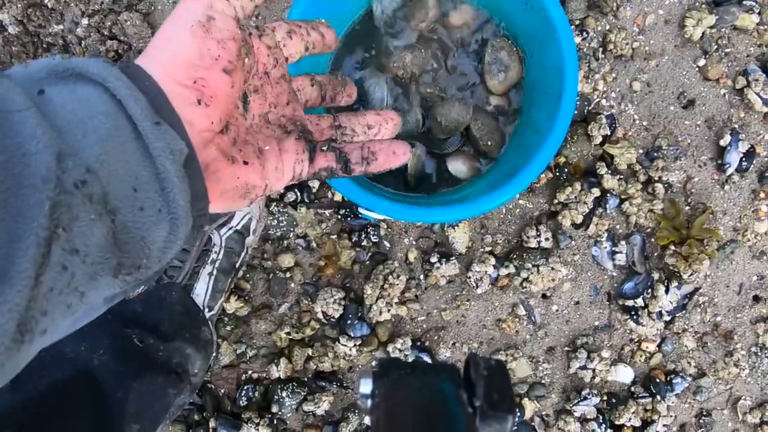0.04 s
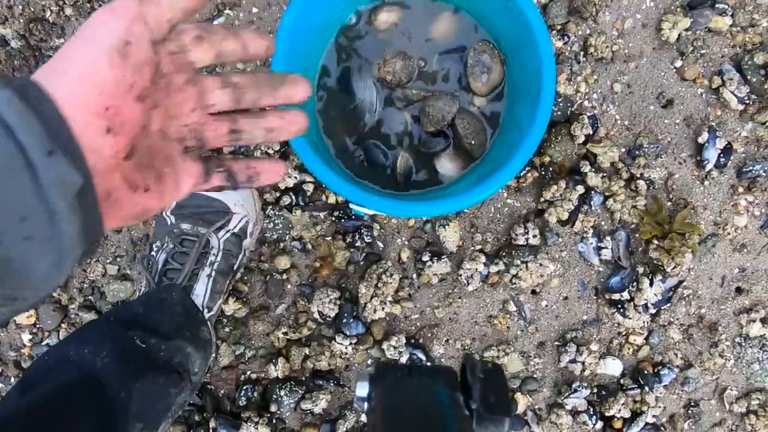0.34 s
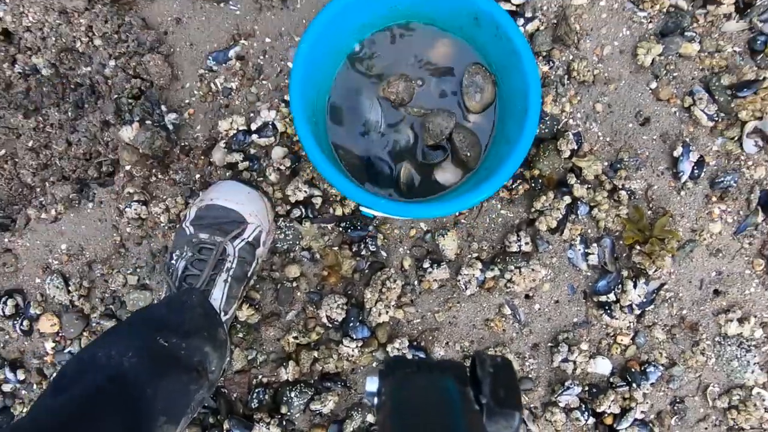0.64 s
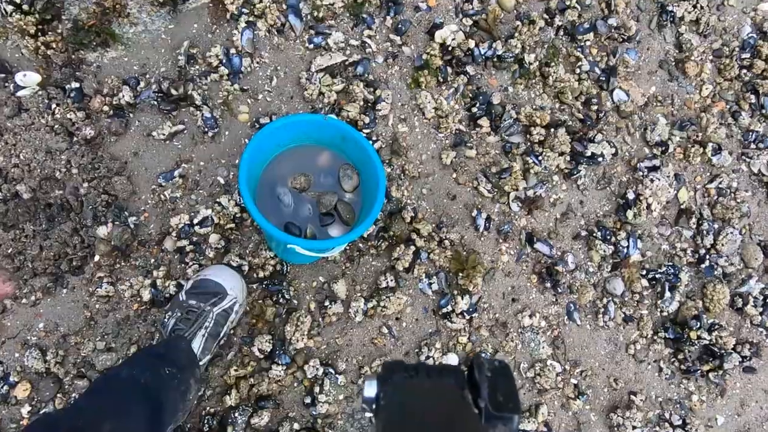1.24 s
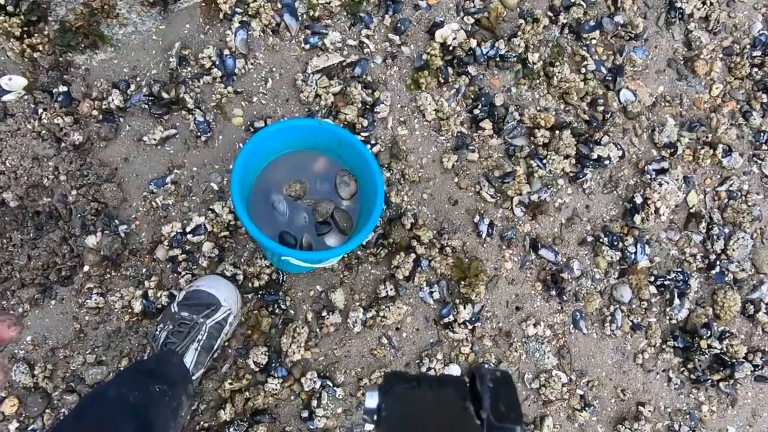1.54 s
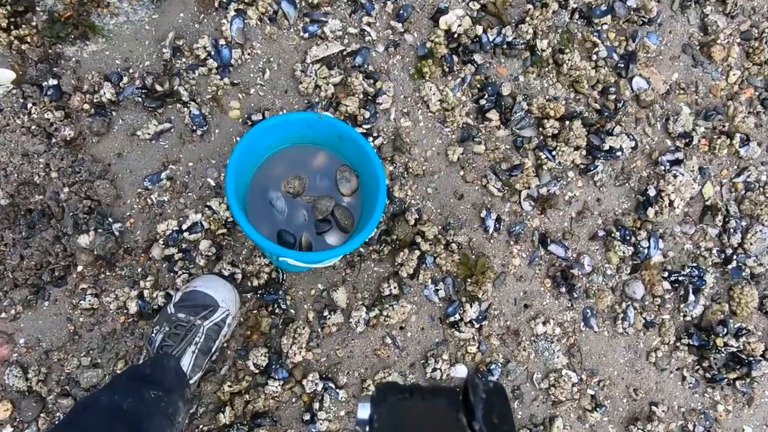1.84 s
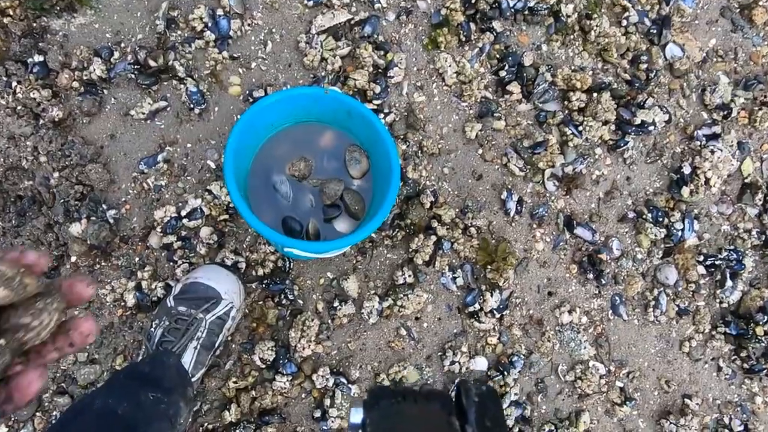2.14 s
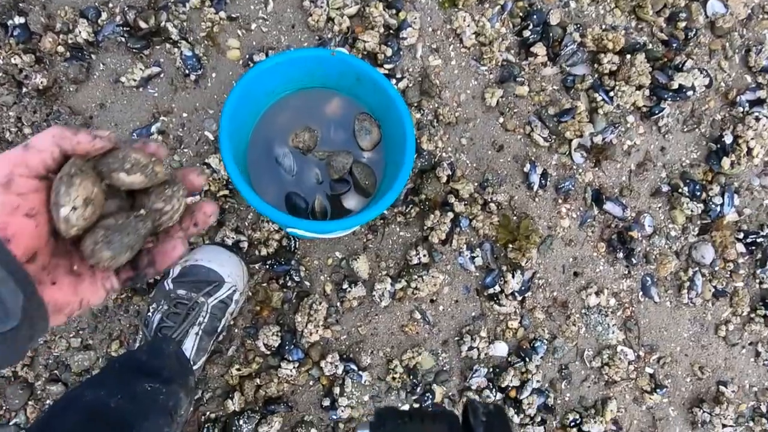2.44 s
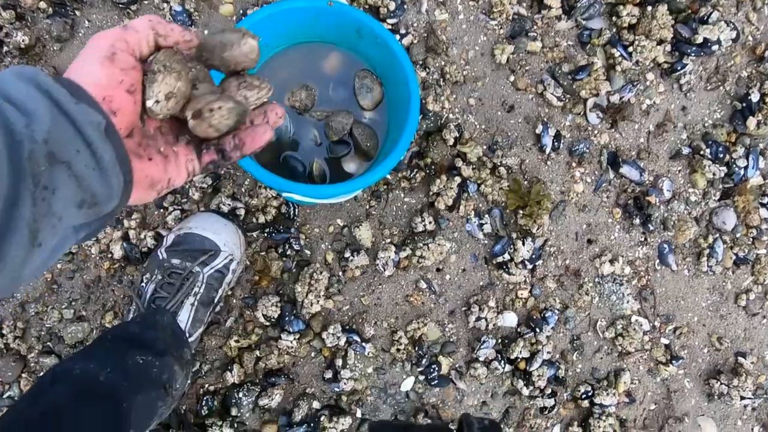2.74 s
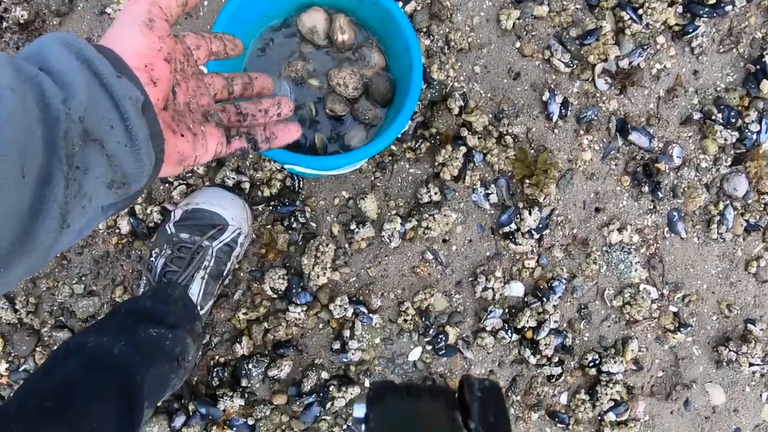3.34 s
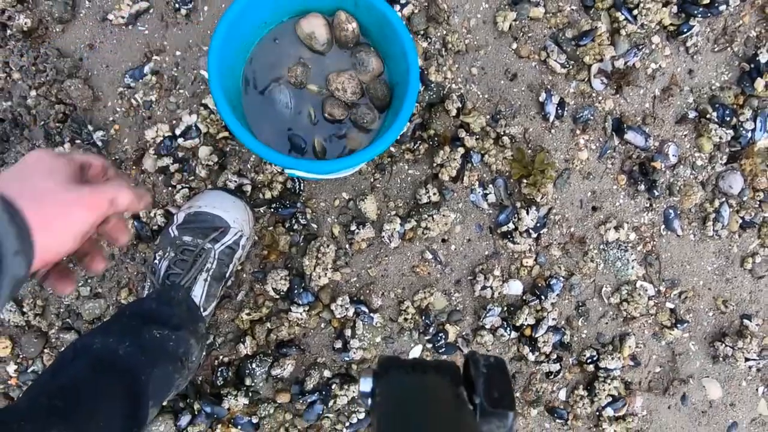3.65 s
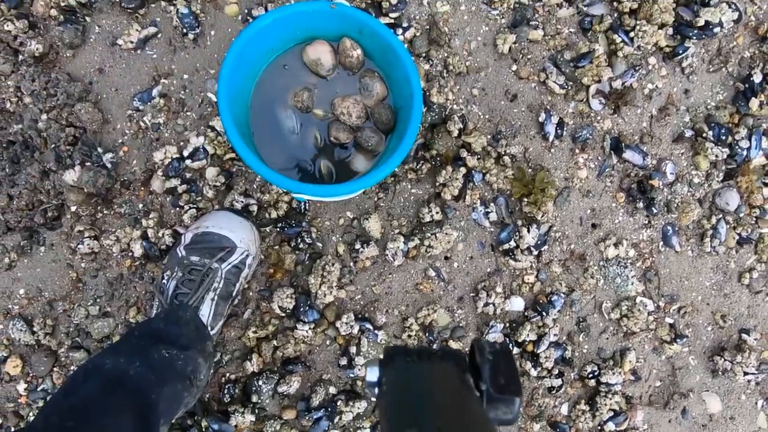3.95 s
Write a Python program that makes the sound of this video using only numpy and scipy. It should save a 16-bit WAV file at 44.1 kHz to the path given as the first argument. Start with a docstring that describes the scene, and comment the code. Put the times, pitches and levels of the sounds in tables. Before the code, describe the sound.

Close up on a pebbly beach, two handfuls of clams tumble into a bucket of water, knocking and splashing about three seconds apart. Between them come pebble clicks, a sleeve swish and a microphone scrape, over faint wind and ticking grit.

```python
"""A shingle beach, the microphone close to a plastic bucket of shallow water. Two handfuls of clams drop in,
three seconds apart: shells ring on shells, knock the bucket and stir up bubbles and spray. In between, pebbles
click and scrunch, a sleeve swishes, and after one second a scrape sounds right at the microphone; soon after,
the sound cuts out briefly. Wet grit ticks and low wind rumbles throughout."""
import sys
import numpy as np
from scipy import signal
from scipy.fft import rfft, irfft, next_fast_len
from scipy.io import wavfile
from scipy.ndimage import map_coordinates

SR = 44100
rng = np.random.default_rng(int(sys.argv[2]) if len(sys.argv) > 2 else 0)


def wrap_up_sound(samples):
    """Save the sound to the file named by the first command line argument, as 16-bit audio."""
    columns = np.atleast_2d(samples).T
    # keep every value between -1 and 1, then stretch to whole-number steps
    tamed = np.clip(columns, -1, 1)
    steps = np.round(tamed * 32767).astype(np.int16)
    wavfile.write(sys.argv[1], SR, steps)


N = 176400

# microphone colour on shells and drips, bright middle, sharp drop near 5 kHz: frequency_hz, gain_db
MIC_TONE = [(300, -47.5), (1500, 3.5), (2300, -0.5), (4450, 2.5), (5100, -9.5), (8000, -39.5),
            (16000, -46.5)]


def amp(db):
    """Decibels to gain."""
    return 10 ** (np.asarray(db) / 20)


def unit(x):
    """Scale to rms 1."""
    return x / np.sqrt(np.mean(x ** 2) + 1e-20)


def swell(rows, column=1):
    """Gain per sample from rows of time_s, level_db; silent outside them."""
    rows = np.array(rows)
    return amp(np.interp(np.arange(N) / SR, rows[:, 0], rows[:, column], left=-np.inf, right=-np.inf))


def wobble(per_s):
    """A smooth random curve through per_s knots a second."""
    return map_coordinates(rng.standard_normal(N // 20), [np.arange(N) * per_s / SR])


def colour(x, tone):
    """Minimum-phase filter through points of frequency_hz, gain_db on a log frequency axis."""
    size = 2 * next_fast_len(len(x))
    hz, db = np.transpose(tone)
    gain = amp(np.interp(np.log(np.fft.rfftfreq(size, 1 / SR) + 1), np.log(hz + 1), db))
    cepstrum = irfft(np.log(gain))
    cepstrum[1:size // 2] *= 2
    cepstrum[size // 2 + 1:] = 0
    return irfft(rfft(x, size) * np.exp(rfft(cepstrum)))[:len(x)]


def add(track, start_s, x):
    """Mix x into the track at start_s."""
    i = int(round(start_s * SR))
    lo, hi = max(i, 0), min(i + len(x), N)
    if hi > lo:
        track[lo:hi] += x[lo - i:hi - i]


def fade(t, t60):
    """Exponential decay, 60 dB down after t60 seconds."""
    return np.exp(-np.log(1000) * t / t60)


def specks(per_s, spread_db):
    """Sparse random impulses of uneven size, rms 1."""
    impulses = (rng.random(N) < per_s / SR) * rng.choice([-1, 1], N)
    return unit(impulses * amp(spread_db * np.clip(rng.standard_normal(N), -2, 2)))


def gritty(tone, per_s, share):
    """Coloured noise with a share of its power in grains, rms 1."""
    hiss = np.sqrt(1 - share) * rng.standard_normal(N)
    grains = np.sqrt(share) * specks(per_s, spread_db=9.1)
    return unit(colour(hiss + grains, tone))


def wet_grit():
    """Wet grit and clothing rustle and tick all around the microphone."""
    # level of the rustle: time_s, middle_db, treble_db
    levels = [(0, -54.5, -62), (.45, -60, -73), (.75, -56, -72), (.88, -49, -66), (1.08, -56.5, -75),
              (1.36, -65.5, -86), (1.76, -58, -80.5), (1.95, -57.5, -73), (2.13, -60, -73),
              (2.23, -55.5, -62.5), (2.42, -48, -68.5), (2.6, -54, -66.5), (2.74, -54, -69.5),
              (2.9, -47, -57), (3.02, -53.5, -70), (3.46, -55.5, -74.5), (3.86, -53.5, -67),
              (4.05, -54, -88)]
    # tones of the grit, its treble sparkle and the wet ticks: frequency_hz, gain_db
    grit_tone = [(100, -35.5), (500, -3.5), (1000, 3.5), (1380, 5), (1750, 3.5), (2900, 4), (3900, 5.5),
                 (4600, 0), (5300, -16.5), (7000, -40), (16000, -85.5)]
    sparkle_tone = [(3000, -31.5), (5200, -3), (6400, -5), (7800, 5), (10700, -2.5), (11800, -10),
                    (16000, -18)]
    tick_tone = [(400, -44), (1080, -3.5), (1410, 9), (1800, -3.5), (4300, -2.5), (5300, -17), (9000, -19),
                 (16000, -59)]
    grit = gritty(grit_tone, per_s=500, share=0.29) * amp(3.3 * wobble(24.72))
    sparkle = gritty(sparkle_tone, per_s=400, share=0.45) * amp(2.7 * wobble(64))
    tick_decay = fade(np.arange(SR // 20) / SR, t60=0.012)
    tick_power = signal.fftconvolve(specks(per_s=70, spread_db=3.5) ** 2, tick_decay ** 2)[:N]
    ticks = unit(colour(np.sqrt(np.abs(tick_power)) * rng.standard_normal(N), tick_tone))
    return (grit + amp(-3.5) * ticks) * swell(levels) + sparkle * swell(levels, column=2)


def wind():
    """Low wind rumbles, wavering slightly in level."""
    # tone of the rumble: frequency_hz, gain_db
    rumble_tone = [(12, 0), (28, 3), (55, 0), (115, -5), (160, 1.5), (225, -4.5), (300, -12.5), (420, -22),
                   (700, -24.5), (2000, -80.5)]
    return unit(colour(rng.standard_normal(N), rumble_tone)) * amp(-42 + 1.47 * wobble(5.6))


def contacts(hits, body_modes, scatter_t60_s, scatter_db, grind_db):
    """Each contact grinds, knocks a body, rings a shell, cracks at its edge and scatters nearby."""
    # modes of a shell: pitch_ratio, level_db, t60_s
    shell_modes = [(.68, -13.5, 0.023), (.87, 1.5, 0.0095), (1, -2.5, 0.026), (1.14, -1, 0.015),
                   (1.36, -9.5, 0.0053)]
    # modes of its thin lip: pitch_hz, level_db, t60_s
    lip_modes = [(7150, 5, 0.021), (8130, 3, .014), (9200, -1.5, 0.0098), (10830, -3.5, .012)]
    # tone of the edge crack: frequency_hz, gain_db
    crack_tone = [(1000, -31), (4000, 13.5), (5500, 7.5), (7200, 7.5), (8600, -10.5), (10400, 7.5),
                  (12000, -5.5), (16000, -35)]
    blow_s, grind_s, glancing_db = 0.0044, 0.0027, -27
    out, t, lead = np.zeros(N), np.arange(SR // 10) / SR, SR // 100

    def burst(t60):
        return rng.standard_normal(len(t)) * fade(t, t60)

    def ring(modes, scale, life):
        return sum((-1) ** k * amp(db + rng.normal(0, 1.1)) * fade(t, t60 * life)
                   * np.sin(2 * np.pi * pitch * scale * rng.normal(1, 0.023) * t)
                   for k, (pitch, db, t60) in enumerate(modes))

    for start_s, knock_db, shell_db, shell_hz, crack_db in hits:
        # a hard blow is cleaner than a glancing one; it wedges the shell and cuts its ring short
        rough = amp(-0.42 * max(max(shell_db, knock_db) - glancing_db, 0))
        life = rough ** 0.65
        grind = rng.standard_normal(lead) * np.exp(-t[:lead][::-1] / grind_s)
        grind *= rough * amp(grind_db) / np.linalg.norm(grind)
        scatter = burst(scatter_t60_s)
        scatter *= rough * amp(scatter_db) / np.linalg.norm(scatter)
        path = np.concatenate([grind, [1], scatter])
        shell_ring = unit(ring(shell_modes, shell_hz, life))
        rasp = amp(5.5) * unit(burst(0.0097 * life))
        shell = colour(shell_ring + rasp, MIC_TONE)
        crack = unit(colour(burst(0.005 * life), crack_tone))
        lip = amp(-4) * unit(ring(lip_modes, 1, life))
        knock = ring(body_modes, rng.normal(1, 0.06), life=1)  # pitch depends on where the blow lands
        for level_db, part in (knock_db, knock), (shell_db, shell), (crack_db, crack + lip):
            heard = signal.fftconvolve(part, path)[:len(t)]
            heard *= np.sqrt(blow_s * SR / np.sum(heard ** 2))  # the energy of blow_s at rms 1
            add(out, start_s - lead / SR, amp(level_db) * heard)
    return out


def clams():
    """Clams land on each other and knock the bucket; the sound scatters off its wall."""
    # landings: start_s, knock_db, shell_db, pitch_hz, crack_db
    landings = [(.0049, -15, -20.5, 2830, -39), (.0109, -28.5, -16, 2980, -35.5),
                (.0183, -30.5, -20.5, 3330, -52), (.024, -27.5, -30.5, 2890, -57),
                (.0526, -34, -29.5, 4090, -47), (.0594, -36.5, -31.5, 3250, -56),
                (.0687, -30, -38, 3220, -53), (.0916, -32, -28.5, 3350, -42.5),
                (.0973, -31.5, -54, 3440, -48), (.1045, -56, -38.5, 3500, -43),
                (.115, -30.5, -31, 3510, -52), (.1244, -31.5, -19.5, 2450, -48),
                (.1588, -28.5, -40, 2900, -55), (3.1069, -17.5, -21, 2990, -25),
                (3.1466, -31.5, -32, 2980, -50), (3.156, -35, -22, 3840, -36),
                (3.1598, -27, -58, 3180, -52), (3.1907, -26.5, -22.5, 3560, -36),
                (3.1956, -37.5, -26, 3380, -46), (3.2245, -34.5, -14, 4200, -35.5),
                (3.2353, -29.5, -25.5, 3950, -54), (3.2651, -26.5, -16, 3400, -39),
                (3.2991, -28, -23, 2970, -38), (3.3043, -24.5, -38, 2820, -54),
                (3.3222, -31.5, -24.5, 2390, -83), (3.3272, -30, -30, 3420, -48),
                (3.3555, -37.5, -60, 3200, -46), (3.3875, -41.5, -26.5, 2820, -43),
                (3.47, -37, -53, 2900, -82)]
    # modes of the bucket with its water: pitch_hz, level_db, t60_s
    bucket_modes = [(661, 1, 0.025), (855, -1.5, 0.019), (1317, 2, 0.025), (1660, -9, 0.016)]
    return contacts(landings, bucket_modes, scatter_t60_s=0.048, scatter_db=-2, grind_db=-4)


def splashes():
    """Bubbles rising in pitch and fine spray last while the clams tumble in, then settle."""
    # water stirred by each handful: start_s, hold_s, bubbles_db, spray_db
    handfuls = [(0.035, 0.075, -36, -39), (3.149, 0.22, -43, -45.5)]
    # tones of the bubbles and the spray: frequency_hz, gain_db
    bubble_tone = [(200, -9), (420, 6.5), (610, 10), (820, 7.5), (1050, -21.5), (1330, -19), (1800, -15.5),
                   (4000, -16.5), (8000, -17.5)]
    spray_tone = [(200, -4.5), (600, 9.5), (1800, 14), (4400, 11), (5300, -15.5), (7000, -5), (16000, -34)]
    bubbles_per_s, bubble_hz, ring_cycles, pitch_rise = 300, 800, 9.9, 0.15
    rise_s, fall_db_per_s = 0.06, 178
    now, t = np.arange(N) / SR, np.arange(SR // 20) / SR
    bubbles, out = np.zeros(N), np.zeros(N)
    for k, (late, pitch, size) in enumerate(rng.standard_normal((int(bubbles_per_s * N / SR), 3))):
        hz = bubble_hz * np.exp(0.33 * pitch)
        t60 = ring_cycles / hz
        chirp = np.sin(2 * np.pi * hz * t * (1 + pitch_rise * t / t60 / 2))
        add(bubbles, (k + late) / bubbles_per_s, amp(5.7 * size) * fade(t, t60) * chirp)
    bubbles = unit(colour(bubbles, bubble_tone))
    spray = gritty(spray_tone, per_s=700, share=0.68)
    for start_s, hold_s, bubbles_db, spray_db in handfuls:
        stir = np.clip((now - start_s) / rise_s, 0, 1)
        settle = amp(-fall_db_per_s * np.maximum(now - start_s - hold_s, 0))
        out += stir * settle * (amp(bubbles_db) * bubbles + amp(spray_db) * spray)
    return out


def trickle():
    """Tiny drops keep the gaps between the shells ringing after the first handful."""
    # resonances of the gaps: pitch_hz, width_hz, level_db
    gap_modes = [(1350, 110, 4.5), (3423, 200, -4), (4420, 200, -7)]
    # water draining through the heap: time_s, level_db
    levels = [(.04, -46.5), (.24, -53.5), (.52, -54), (.85, -71)]
    hz = np.fft.rfftfreq(N, 1 / SR)
    gaps = sum(amp(db) * 1j * hz * width / (centre ** 2 - hz ** 2 + 1j * hz * width)
               for centre, width, db in gap_modes)
    drips = irfft(rfft(specks(per_s=70, spread_db=2.5)) * gaps, N)
    return unit(colour(drips, MIC_TONE)) * swell(levels)


def pebbles():
    """Shells and pebbles click in the hand and underfoot; the sound scatters off the ground."""
    # clicks: start_s, knock_db, ring_db, pitch_hz, crack_db
    clicks = [(.433, -47.5, -40, 3100, -66), (.475, -52, -48, 3480, -52), (.586, -51.5, -48, 3470, -50.5),
              (.699, -46.5, -48, 3040, -68), (1.0185, -45.5, -38.5, 3930, -56.5),
              (1.0421, -27.5, -28, 3460, -49), (1.6643, -38, -39, 3430, -58.5),
              (2.02, -45, -49.5, 2700, -61), (2.4192, -25, -36, 3750, -44),
              (2.5458, -38.5, -49.5, 2100, -62), (2.8144, -34.5, -36, 4040, -51),
              (3.0513, -45.5, -31, 3810, -46.5), (3.5235, -53, -30, 2920, -50),
              (3.5425, -33, -29, 3096, -44.5), (3.629, -44, -39, 4060, -49.5), (3.739, -59, -41, 2580, -48),
              (3.8585, -35, -39, 1960, -48.5)]
    # modes of a cupped hollow: pitch_hz, level_db, t60_s
    hollow_modes = [(860, 12, 0.01), (930, 3, 0.0084), (1284, 24, 0.0091)]
    return contacts(clicks, hollow_modes, scatter_t60_s=0.032, scatter_db=-7.5, grind_db=-14)


def rubbing():
    """A sleeve swishes as the arm draws back; a scrape follows right at the microphone."""
    # levels of the swish and the scrape: time_s, level_db
    swish_levels = [(.82, -83), (.89, -46.5), (.93, -36.5), (.968, -31.5), (.99, -46), (1.05, -38.5)]
    scrape_levels = [(1.095, -64.5), (1.113, -40.5), (1.127, -28), (1.2, -41)]
    # their tones: frequency_hz, gain_db
    cloth_tone = [(240, -44), (400, -12), (1630, -4), (1820, 0.5), (3020, 0), (3640, 4.5), (6540, -16.5),
                  (7750, -8), (16000, -49.5)]
    scrape_tone = [(15, -54), (25, 1), (161, -6.5), (936, -22), (1100, -13), (3520, -15), (5430, -25),
                   (8360, -18.5), (16000, -46)]
    swish = gritty(cloth_tone, per_s=1000, share=0.46) * swell(swish_levels)
    scrape = gritty(scrape_tone, per_s=1000, share=0.2) * swell(scrape_levels)
    return (swish + scrape) * amp(3.1 * wobble(120))


def scrunches():
    """Sandy shells and shingle grind together: dense slips around one broad resonance."""
    # short swells of grinding: peak_s, spread_s, level_db, pitch_hz
    grinds = [(1.847, 0.016, -46, 2100), (2.518, 0.014, -43.5, 2500), (3.904, 0.017, -39.5, 2600)]
    # their resonance: pitch_ratio, gain_db
    resonance = [(.3, -34.5), (.8, -9), (1.35, -12.5), (3.6, -53)]
    now, out = np.arange(N) / SR, np.zeros(N)
    for peak_s, spread_s, level_db, pitch_hz in grinds:
        slips = gritty([(pitch_hz * ratio, db) for ratio, db in resonance], per_s=1500, share=0.72)
        out += amp(level_db) * np.exp(-((now - peak_s) / spread_s) ** 2 / 2) * slips
    return out


def sliding_shells():
    """The second handful slips wet off the palm with a thin, high hiss."""
    # level of the hiss: time_s, level_db
    levels = [(3.07, -70), (3.1, -46), (3.135, -66.5), (3.22, -46), (3.29, -78), (3.33, -58.5)]
    # its tone: frequency_hz, gain_db
    hiss_tone = [(5800, -27), (6900, -5), (7400, -8), (8800, -27), (10300, -35), (12000, -31.5)]
    return gritty(hiss_tone, per_s=900, share=0.2) * swell(levels) * amp(3.3 * wobble(70))


def scene():
    """Everything is close and central; only the top octave differs between the two microphone ports."""
    # stereo width: frequency_hz, side_db
    side_tone = [(4000, -57), (8000, -19.5), (11000, -20.5), (13000, 5)]
    hits = clams() + pebbles()
    mid = hits + splashes() + trickle() + sliding_shells() + scrunches() + wet_grit() + wind() + rubbing()
    t = np.arange(SR // 100) / SR
    scatter = rng.standard_normal(len(t)) * fade(t, t60=0.0026)
    side = colour(signal.fftconvolve(mid, scatter / np.linalg.norm(scatter))[:N], side_tone)
    return np.array([mid + side, mid - side])


def record(dry):
    """The sound cuts out briefly and fades back in; nothing passes above the band limit."""
    mute_s, return_s, fade_in_s, top_hz = 1.158, 1.3227, 0.059, 16000
    t, size = np.arange(N) / SR, next_fast_len(N + SR // 2)
    live = np.maximum(t < mute_s, np.clip((t - return_s) / fade_in_s, 0, 1) ** 2)
    passband = np.fft.rfftfreq(size, 1 / SR) < top_hz
    return irfft(rfft(dry * live, size) * passband, size)[:, :N]


dry = scene()
out = record(dry)
wrap_up_sound(out)
```